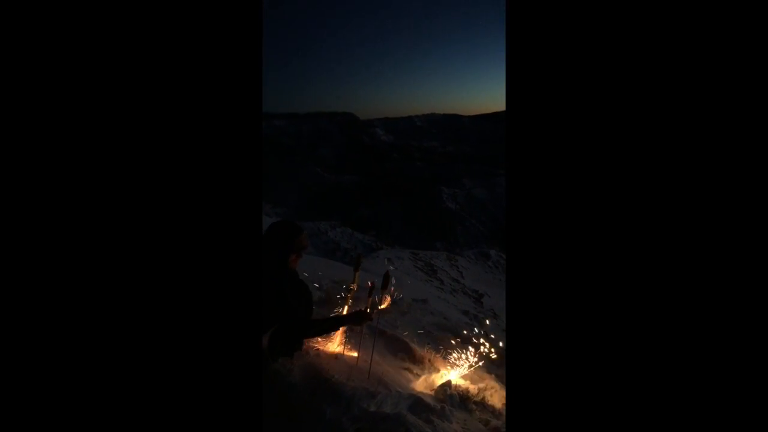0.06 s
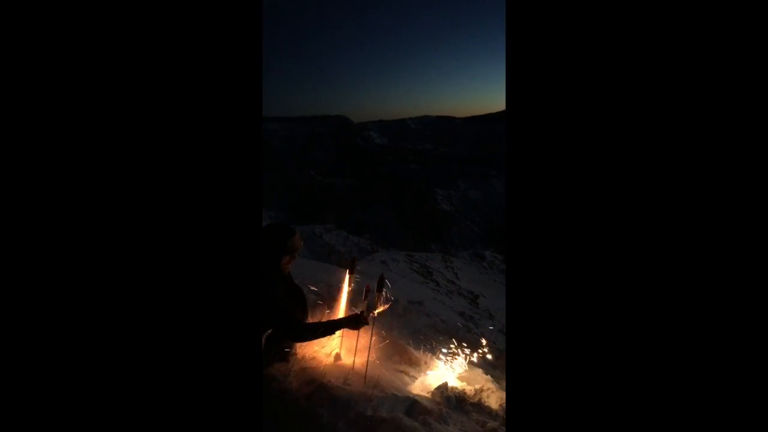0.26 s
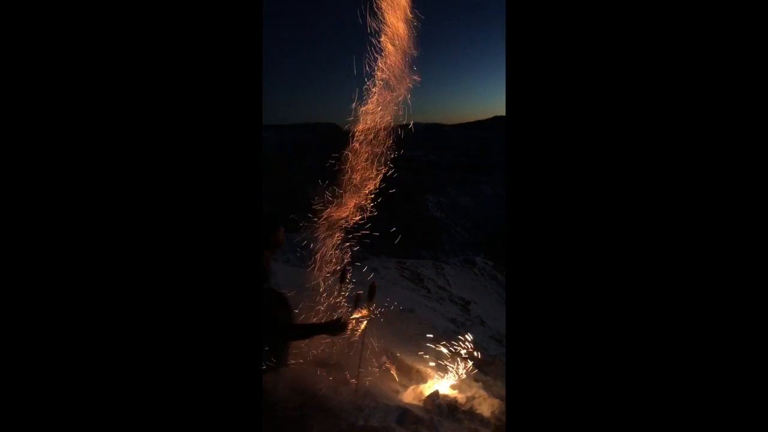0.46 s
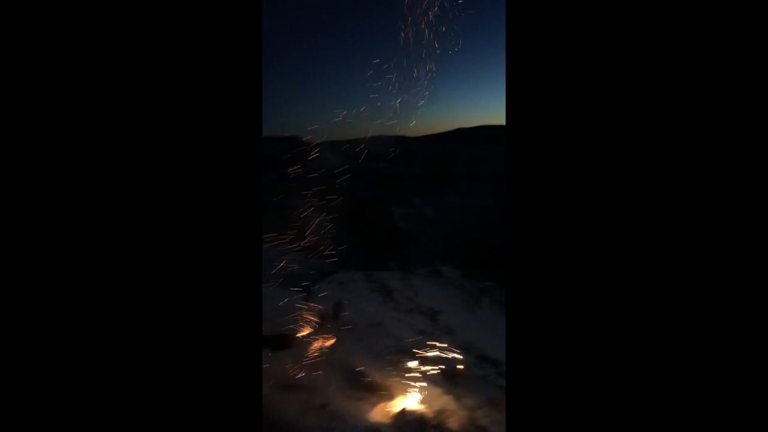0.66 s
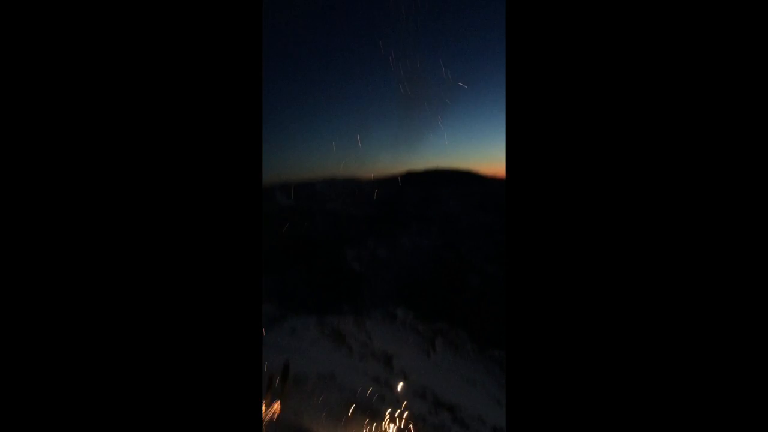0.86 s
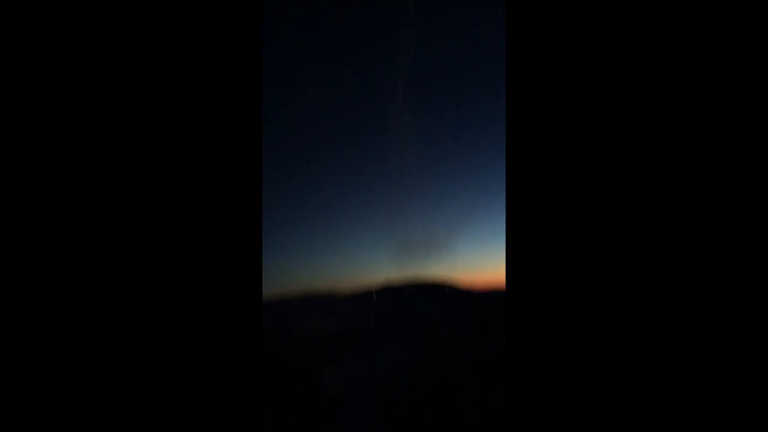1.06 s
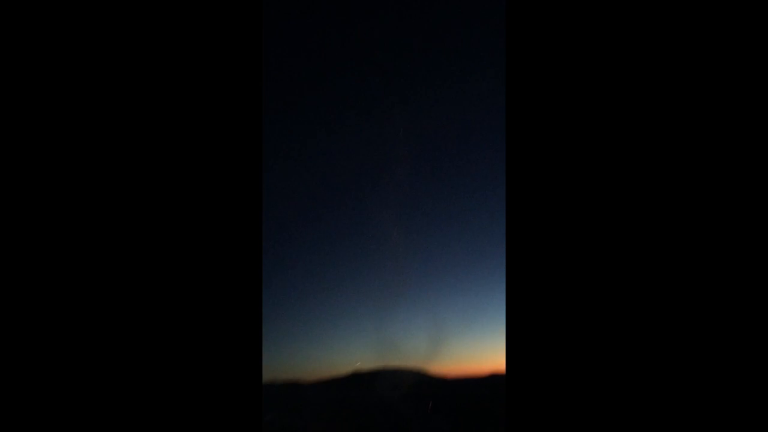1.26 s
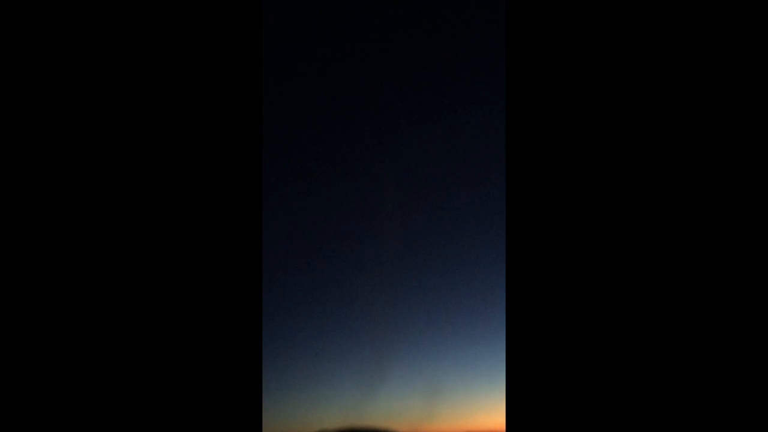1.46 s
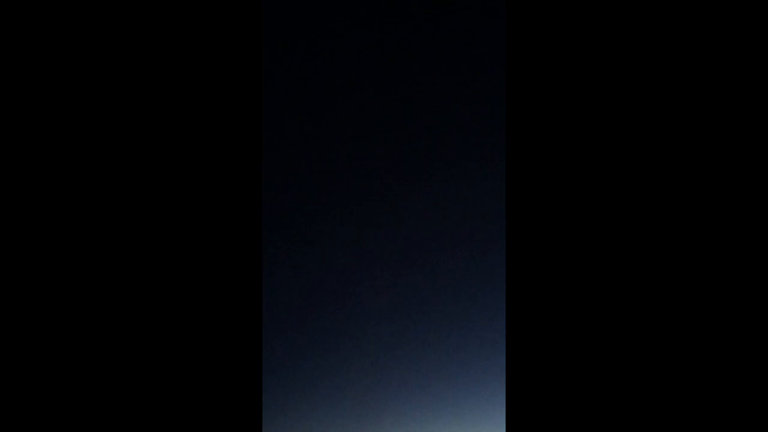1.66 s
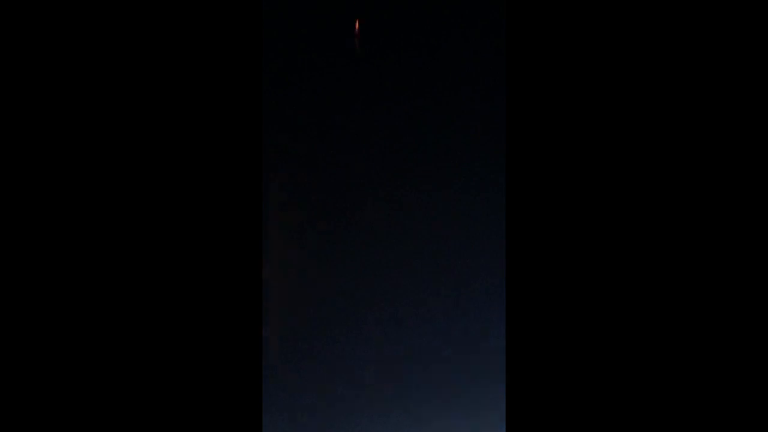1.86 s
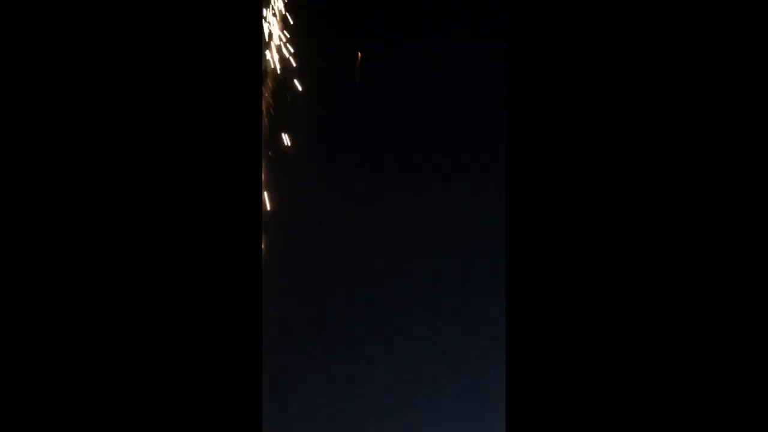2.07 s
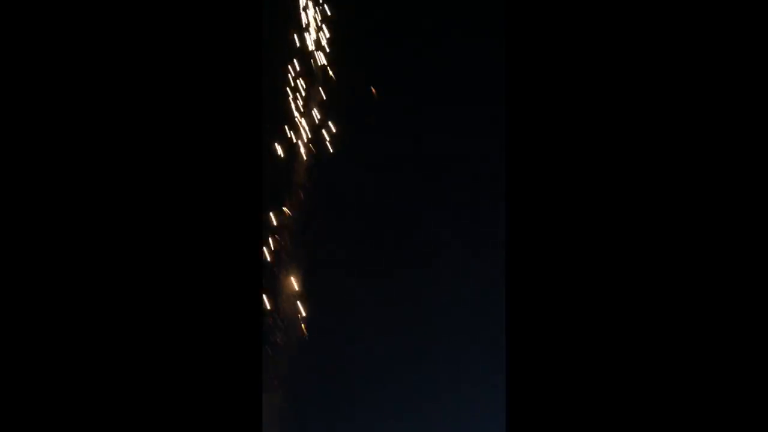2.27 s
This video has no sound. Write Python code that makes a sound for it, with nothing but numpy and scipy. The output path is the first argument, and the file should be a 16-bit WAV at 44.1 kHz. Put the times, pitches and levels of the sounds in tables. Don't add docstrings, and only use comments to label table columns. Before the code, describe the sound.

Two firework rockets whoosh up one after another, the second ending in a sharp pop

```python
import sys
import numpy as np
from scipy import signal
from scipy.fft import rfft, irfft
from scipy.io import wavfile
from scipy.ndimage import uniform_filter1d

SR = 44100
rng = np.random.default_rng(int(sys.argv[2]) if len(sys.argv) > 2 else 0)


def to_wav(s):
    ch = np.atleast_2d(s).T
    pcm = np.round(np.clip(ch, -1, 1) * 32767)
    wavfile.write(sys.argv[1], SR, pcm.astype(np.int16))


def amplitude_ratio(level_db):
    exponent = np.asarray(level_db, float) / 20
    return 10 ** exponent


N = 101429

# start_s, thrust_db, distance_dullness (0-1), ground_echo_share, echo_delay_ms
FIRST_FLIGHT = [
    (0, -39.5, 0.2, .45, 1.22),
    (.05, -36, 0.08, 0.28, 1.2),
    (.14, -32, 0.11, 0.32, 1.24),
    (.25, -21, 0.12, 0.19, 1.11),
    (.345, -11.5, 0.26, 0.26, 1.15),
    (.44, -15.5, 0.16, 0.13, 1.55),
    (.62, -21, 0.71, .2, 1.64),
    (.73, -34, 0.82, 0.078, 1.6),
    (.79, -59.5, 0.4, .2, 1.6),
]
SECOND_FLIGHT = [
    (1.235, -56.5, .1, 0.52, 1.4),
    (1.31, -37.5, 0.29, .35, 1.2),
    (1.44, -29.5, 0.035, 0.47, 1.15),
    (1.53, -24.5, 0.15, 0.74, 1.2),
    (1.555, -18.5, 0.42, 0.37, 1.1),
    (1.74, -13, 0.63, .3, 1.324),
    (1.91, -15.5, 0.41, 0.067, 1.32),
    (2.065, -31.5, 0.77, 0.051, 2),
    (2.11, -62.5, 0.76, .1, 1.5),
]
# time_s, extra_db, half_width_s
SURGES = [
    (.385, 2, 0.031),
    (0.494, 4.5, .03),
    (.575, 2.5, 0.01),
    (1.471, 4.5, .012),
    (1.72, 0.5, 0.017),
    (1.863, 2, 0.0079),
]
# frequency_hz, level_db (per Hz)
FIRST_NEAR = [(60, -30), (300, -9), (550, -8.5), (1000, -6), (1700, -5.5), (4000, -5.5), (10000, -5),
              (15500, -5)]
FIRST_FAR = [(60, -19), (300, -16.5), (500, 2.5), (1000, -1.5), (2000, 4.5), (4000, -0.5), (9000, -10),
             (15500, -28)]
SECOND_NEAR = [(60, -45), (300, -7.5), (800, -10), (1500, -10), (4400, -2.5), (7000, -3.5), (10000, -6),
               (15500, -10.5)]
SECOND_FAR = [(60, -30), (260, -7.5), (430, -21), (700, -7), (1200, -2.5), (1700, 3.5), (5000, -11.5),
              (15500, -14)]
# frequency_hz, half_width_hz, level_db (at full echo)
FIRST_PIT = [(550, 90, -25), (1700, 170, 14), (2480, 130, 9), (3080, 120, 11), (4150, 110, 24),
             (5330, 120, -14), (5820, 110, 12), (6400, 150, 14), (7250, 100, -14)]
SECOND_PIT = [(450, 58, -28), (700, 270, 12.5), (1200, 75, 6), (1580, 450, 5), (1920, 89, -8),
              (4270, 244, 5.5)]
ECHOES = [
    (1.0, 1.0),
    (1.23, -0.74),
]
# time_s, peak_db, first_pitch_hz, decay_s
THUMPS = [(0.0545, -43, 148, 0.0078), (0.359, -27, 110.4, 0.0089), (.392, -32, 90, .02),
          (0.4875, -14, 115, 0.0087), (.575, -52, 70, 0.015), (0.915, -54, 130, 0.02),
          (1.036, -51.5, 89, .02), (1.076, -53, 79, 0.023), (1.251, -52, 70, 0.031), (1.321, -55, 70, .02),
          (1.369, -52, 60, 0.021), (1.472, -39, 111, 0.011), (1.591, -28.5, 90, 0.005),
          (1.55, -45, 70, 0.015), (1.886, -26, 60, 0.027), (1.916, -26, 131, 0.01),
          (2.028, -43, 108, 0.0092)]
# time_s, peak_db, pitch_hz, length_s
TICKS = [(0.913, -61, 900, 0.0045), (0.943, -47, 1500, 0.0055), (1.0735, -42, 2980, .004),
         (1.328, -44, 700, 0.0045), (1.474, -23.5, 1400, 0.012), (1.557, -16, 1750, 0.014),
         (1.591, -13, 880, 0.0011), (0.483, -18.5, 286, 0.0089), (0.5, -22.5, 230, .012),
         (0.92, -53, 250, 0.0094), (0.974, -51.5, 193, 0.014), (1.737, -13, 3500, 0.0009)]
POP = [(1.8752, -3.5, 172, .007)], [(1.8678, -13, 260, .005), (1.874, -6.5, 690, .007),
       (1.871, -15, 430, .006)]
# time_s, sizzle_db
FUSE_LEVEL = [
    (0, -66),
    (.8, -57),
    (.9, -55),
    (1.06, -52.5),
    (1.25, -49.5),
    (1.4, -62),
    (2.13, -54),
    (2.24, -53),
    (2.3, -55),
]
# frequency_hz, level_db (per Hz)
FUSE_COLOUR = [(88, -33), (150, -12.5), (230, -14), (943, -10), (1140, -9), (1420, -11), (1620, -10),
               (5280, -10.5), (15300, -17.5)]


def evened(x):
    return x / np.sqrt(np.mean(abs(x) ** 2) + 1e-20)


def read(points, hz):
    f, value = np.transpose(points)
    return np.interp(np.log(hz + 1), np.log(f + 1), value)


def add(mix, start_s, sound):
    part = mix[round(start_s * SR):][:len(sound)]
    part += sound[:len(part)]


def wander(span_s):
    size = max(round(span_s * SR), 1)
    smooth = uniform_filter1d(rng.standard_normal(N), size)
    return evened(uniform_filter1d(smooth, size))


def noise_band(count, hz, octaves):
    f = np.fft.rfftfreq(count, 1 / SR) + 1
    shape = np.exp(-(np.log2(f / hz) / octaves) ** 2)
    return evened(irfft(rfft(rng.standard_normal(count)) * shape, count))


def hiss(colour):
    frames = N // 128 + 5
    hz = np.fft.rfftfreq(512, 1 / SR)[:, None]
    a, b, patches = rng.standard_normal((frames, 257, 3)).T
    patches = uniform_filter1d(patches, size=3, axis=0)
    patches = evened(uniform_filter1d(patches, size=26, axis=1))
    gain = colour(hz, np.arange(frames) * 128 / SR) * amplitude_ratio(1.6 * patches)
    gain = gain / np.sqrt((gain ** 2).mean(axis=0))
    return evened(signal.istft((a + 1j * b) * gain, nperseg=512, noverlap=384)[1][:N])


def breeze():
    t = np.arange(N) / SR
    level_db = -70 + 4 * wander(0.031) - 10.0 * (t > 2.1)
    return noise_band(N, hz=70, octaves=2.7) * amplitude_ratio(level_db)


def hillside(x):
    t = np.arange(SR // 4) / SR
    tail = noise_band(len(t), hz=1300, octaves=1.15) * np.exp(-t / 0.014)
    return amplitude_ratio(-27) * signal.oaconvolve(x, tail / np.linalg.norm(tail))[:N]


def fuse():
    def colour(hz, t):
        late = np.clip((t - 2.15) / 0.09, 0, 1)
        bump = np.exp(-(np.log2((hz + 1) / 1090) / 0.48) ** 2)
        return amplitude_ratio(read(FUSE_COLOUR, hz)) * amplitude_ratio(6 * late * bump)

    spits_per_s, spit_db = 30, -35.5
    spits = (rng.random(N) < spits_per_s / SR) * amplitude_ratio(2.6 * rng.exponential(1, N))
    spits = signal.oaconvolve(spits, np.exp(-np.arange(200) / 60.))[:N]
    level_db = np.interp(np.arange(N) / SR, *np.transpose(FUSE_LEVEL)) + 1.5 * wander(0.019)
    return hiss(colour) * amplitude_ratio(level_db) * (1 + amplitude_ratio(spit_db) * spits)


def tick(time_s, peak_db, pitch_hz, length_s):
    before = 441
    t = np.arange(-before, 882) / SR
    puff = np.exp(-(t / length_s) ** 2 * np.where(t < 0, 4.0, 1.5))
    swing = np.cos(2 * np.pi * pitch_hz * t) * np.exp(-(t * pitch_hz / 1.6) ** 2)
    snap = swing + 0.35 * puff * noise_band(len(t), pitch_hz * 1.1, octaves=1.3)
    return time_s - before / SR, amplitude_ratio(peak_db) * snap / abs(snap).max()


def thump(time_s, peak_db, pitch_hz, decay_s):
    t = np.arange(0, 0.12, 1 / SR)
    sag, sag_cycles = 0.34, 1.05
    falling_hz = pitch_hz * (sag + (1 - sag) * np.exp(-(t * pitch_hz / sag_cycles) ** 4))
    swing = np.sin(2 * np.pi * np.cumsum(falling_hz) / SR)
    rough = 0.22 * noise_band(len(t), pitch_hz * 2.1, octaves=1.0)
    return time_s, amplitude_ratio(peak_db) * (swing + rough) * np.exp(-t / decay_s) * 1.3


def jet(flight, near, far, pit, roar_db, roar_steepness, roar_hz, roar_octaves):
    at, thrust_db, dullness, share, echo_ms = np.transpose(flight)
    top_db = thrust_db.max()

    def colour(hz, t):
        distance = np.clip(np.interp(t, at, dullness), 0, 1.2)
        colour_db = read(near, hz) * (1.5 - distance) + read(far, hz) * distance
        built_db = np.interp(t, at, np.maximum.accumulate(thrust_db)) - top_db
        bass_db = 0.54 * built_db / (1 + (hz / 700) ** 2)
        cold = np.exp(-(np.maximum(t - at[0], 0) / 0.14) ** 2)
        cold_db = -8 * cold / (1 + (8000 / (hz + 1)) ** 4)
        echo = np.interp(t, at, share) / (1 + (hz / 8750) ** 2)
        pit_db = echo * sum(db * np.exp(-((hz - f) / w) ** 2) for f, w, db in pit)
        turn = -2j * np.pi * hz * np.interp(t, at, echo_ms) / 1000
        bounces = sum(part * np.exp(turn * ratio) for ratio, part in ECHOES)
        comb = abs(1 + 0.6 * echo * bounces)
        hand = 1 + 0.097 * np.cos(2 * np.pi * hz * 0.323 / 1000)
        return amplitude_ratio(colour_db + bass_db + cold_db + pit_db) * comb * hand

    t = np.arange(N) / SR
    surge_db = sum(db * np.exp(-((t - s) / w) ** 2) for s, db, w in SURGES)
    level_db = np.interp(t, at, thrust_db, -120, -120) + surge_db
    flicker_db = 0.7 * wander(0.01)
    roar = noise_band(N, roar_hz, roar_octaves) * amplitude_ratio(2.5 * wander(0.0089))
    roar_level_db = roar_db + top_db + roar_steepness * (level_db - top_db)
    return hiss(colour) * amplitude_ratio(level_db + flicker_db) + roar * amplitude_ratio(roar_level_db)


def scene():
    jets = jet(FIRST_FLIGHT, FIRST_NEAR, FIRST_FAR, FIRST_PIT,
               roar_db=-24.5, roar_steepness=1.15, roar_hz=135, roar_octaves=0.87)
    jets += jet(SECOND_FLIGHT, SECOND_NEAR, SECOND_FAR, SECOND_PIT,
                roar_db=-20, roar_steepness=2, roar_hz=242, roar_octaves=1.64)
    mix = breeze() + hillside(jets) + fuse() + jets
    pop_thumps, pop_ticks = POP
    for row in TICKS + pop_ticks:
        add(mix, *tick(*row))
    for row in THUMPS + pop_thumps:
        add(mix, *thump(*row))
    return np.array([mix, mix])


def band_limit(x):
    return signal.sosfilt(signal.butter(12, 15670, fs=SR, output="sos"), x)


def record(dry):
    low_cut = signal.butter(2, 38, "high", fs=SR, output="sos")
    thin = signal.sosfilt(low_cut, dry)
    limit = 0.85
    return band_limit(limit * np.tanh(thin / limit))


dry = scene()
out = record(dry)
to_wav(out)
```